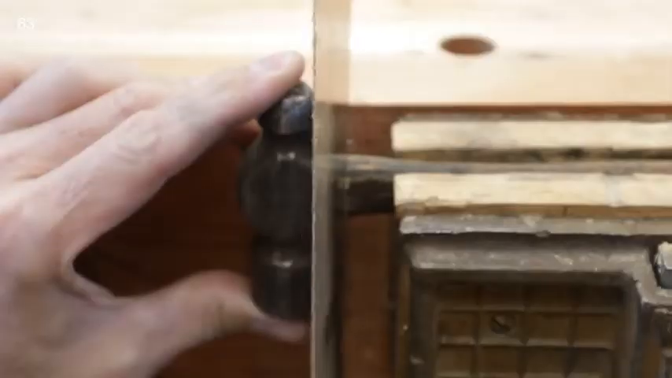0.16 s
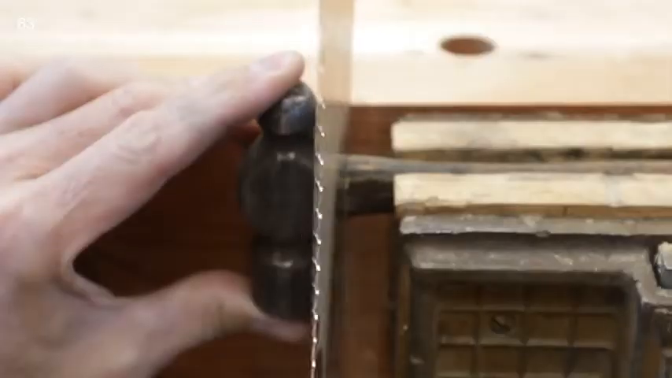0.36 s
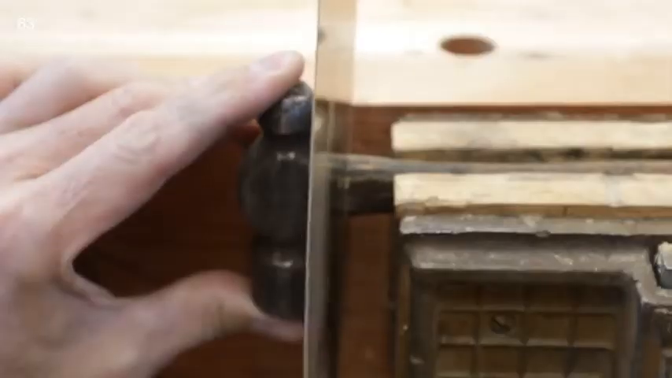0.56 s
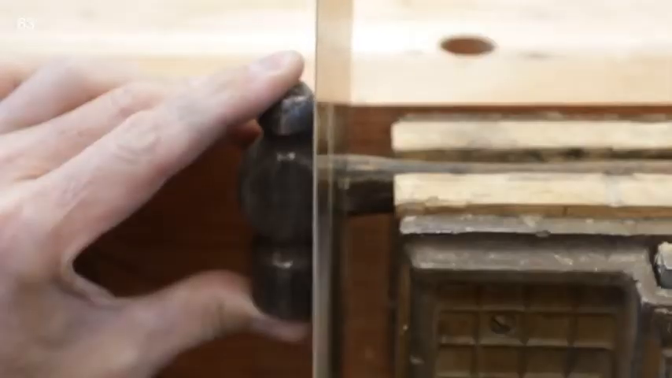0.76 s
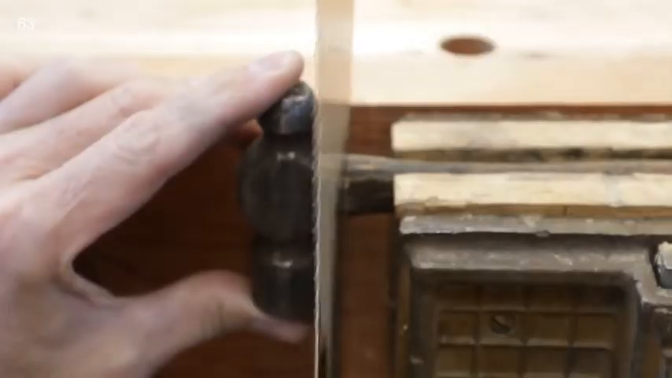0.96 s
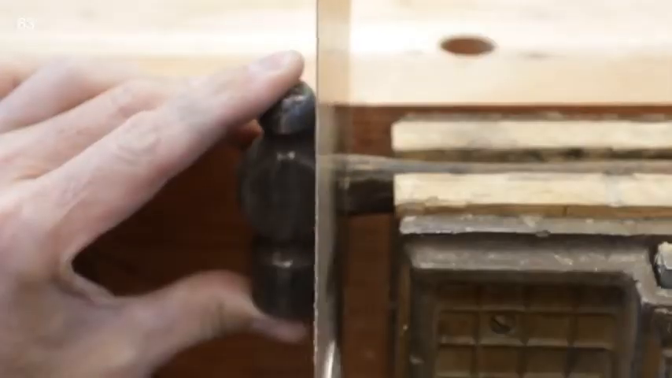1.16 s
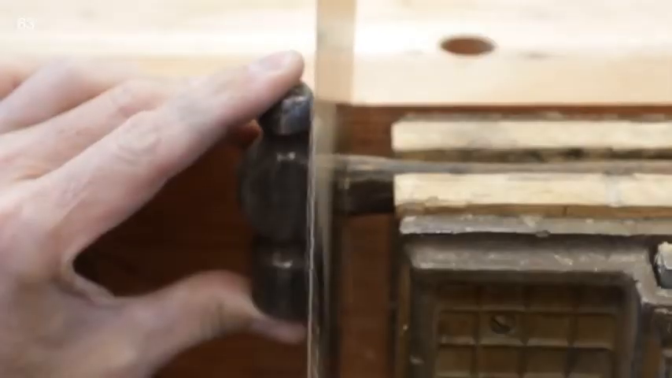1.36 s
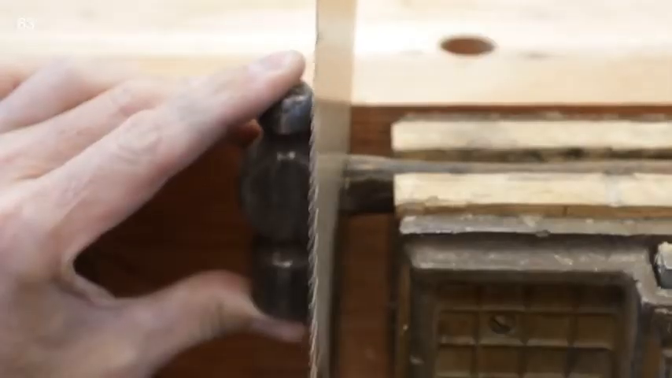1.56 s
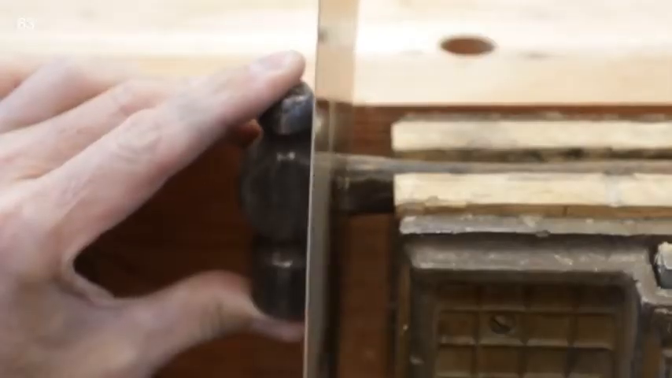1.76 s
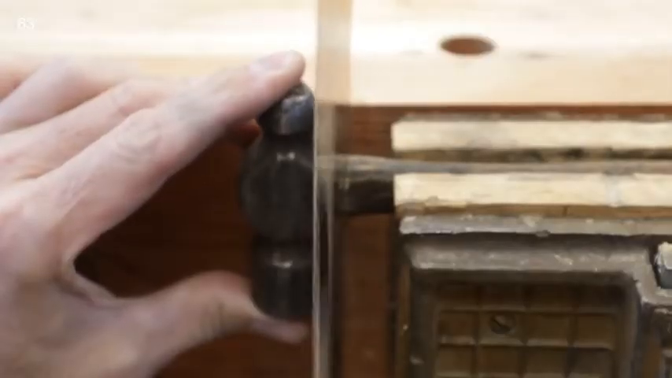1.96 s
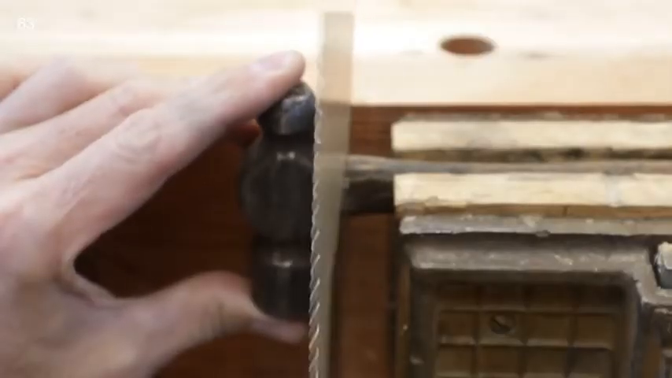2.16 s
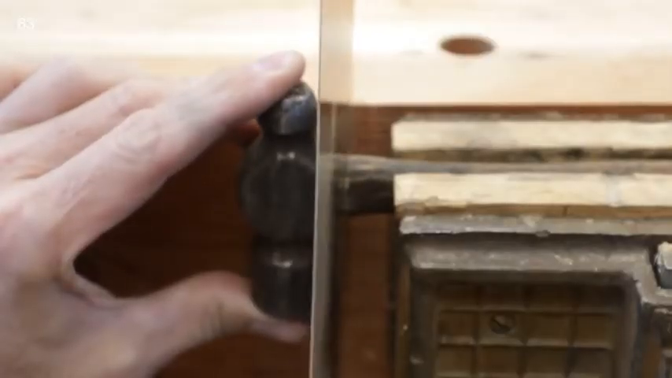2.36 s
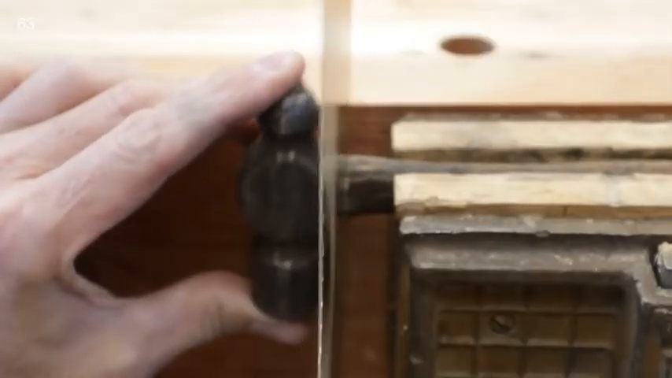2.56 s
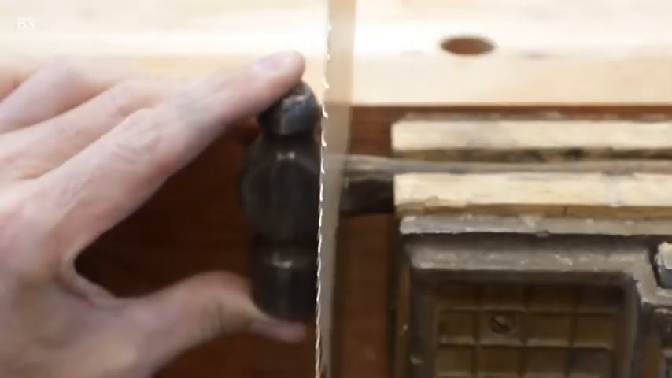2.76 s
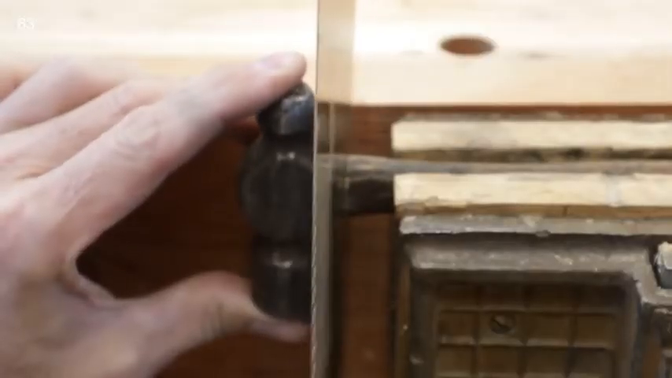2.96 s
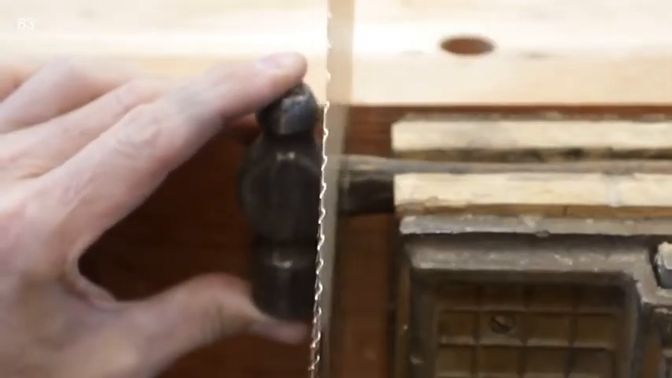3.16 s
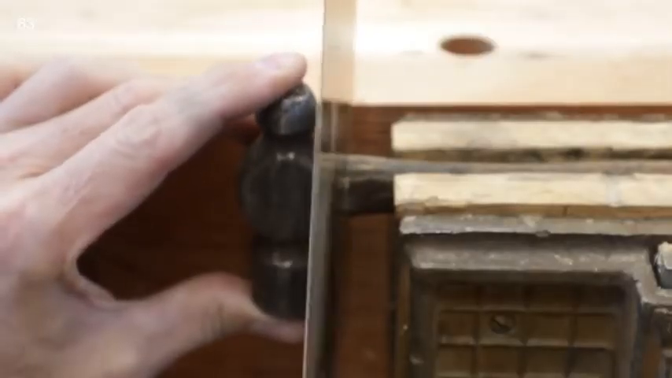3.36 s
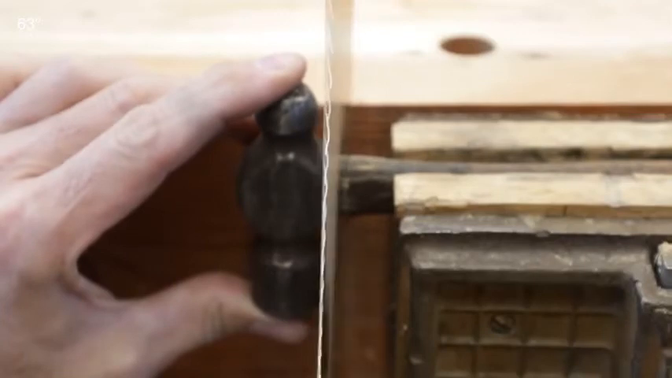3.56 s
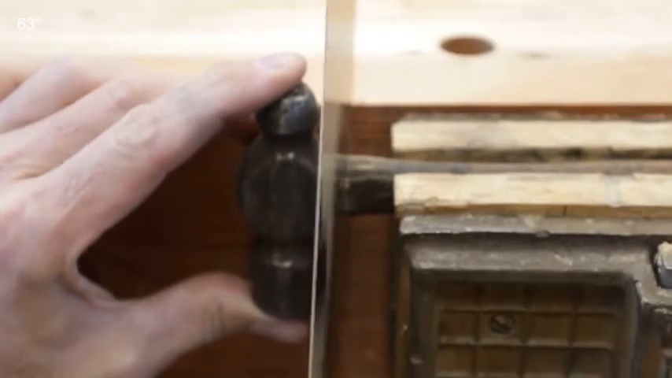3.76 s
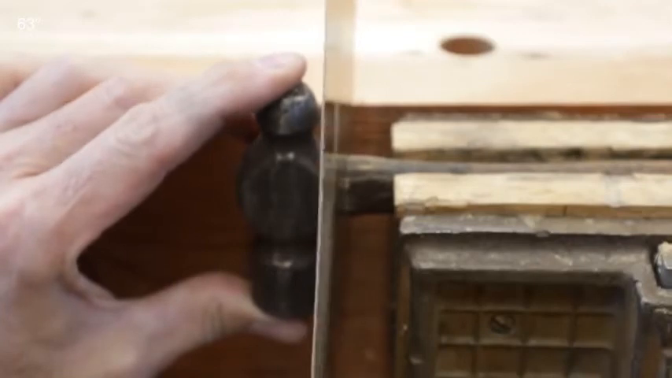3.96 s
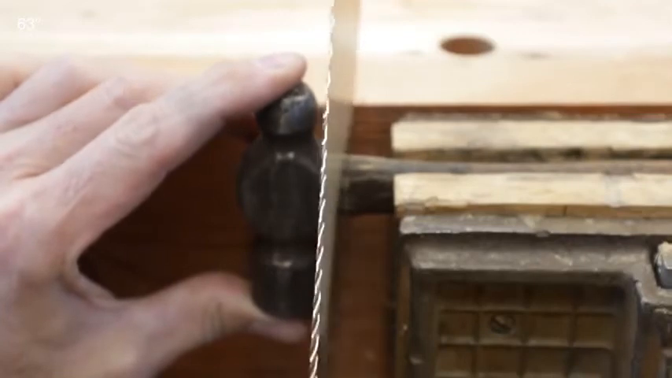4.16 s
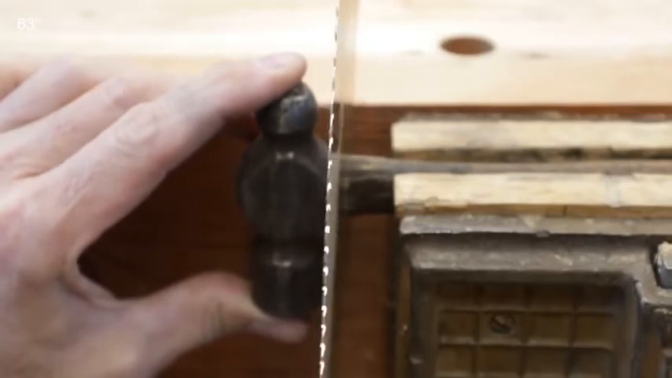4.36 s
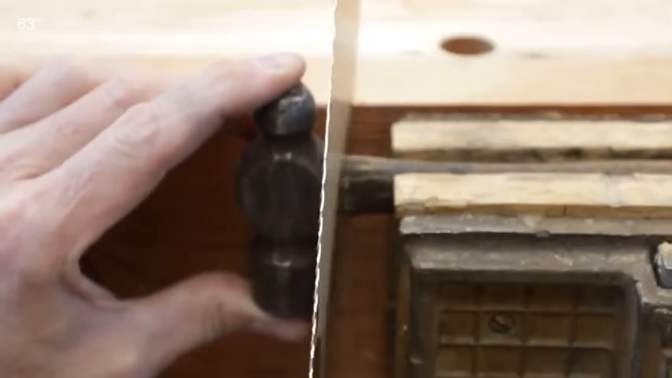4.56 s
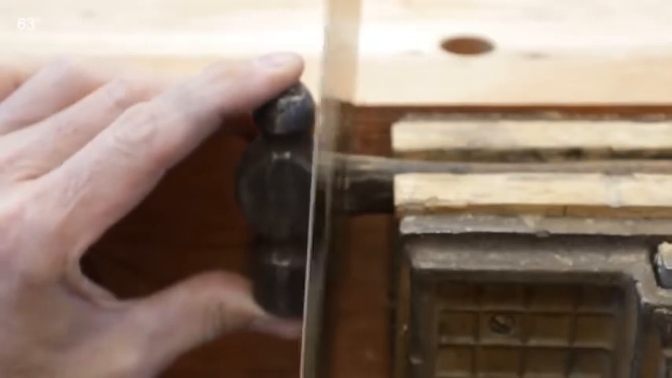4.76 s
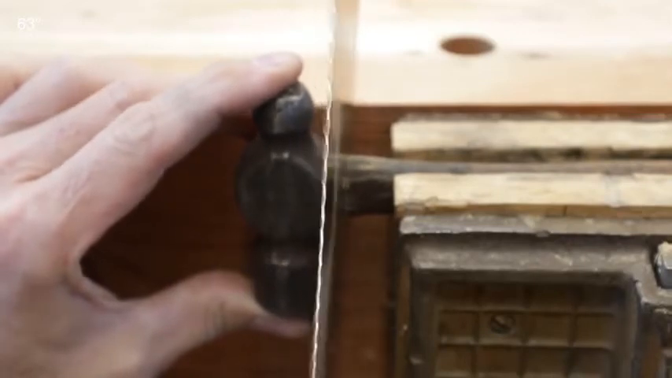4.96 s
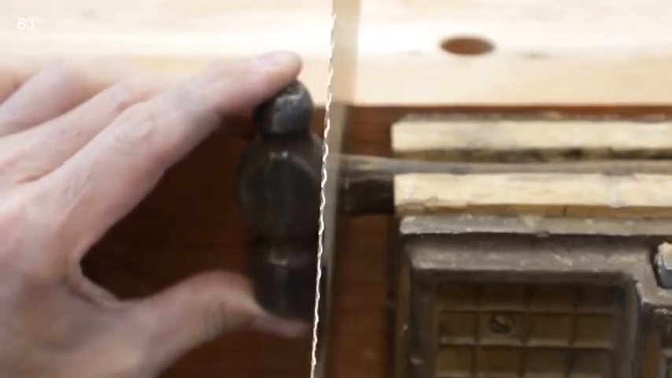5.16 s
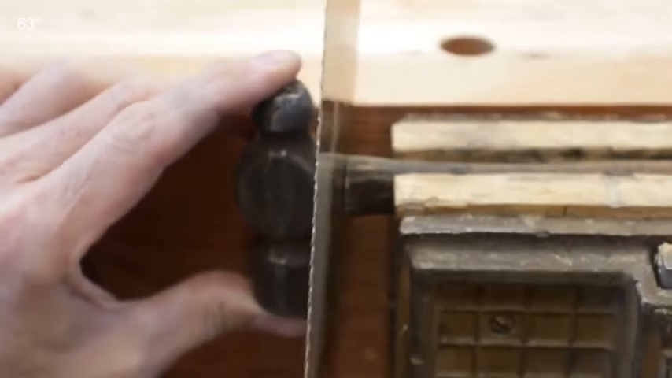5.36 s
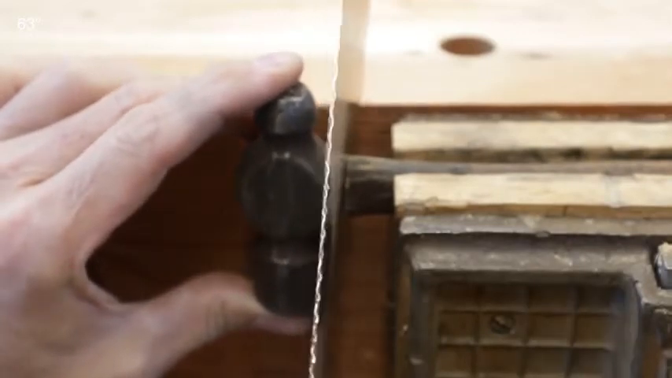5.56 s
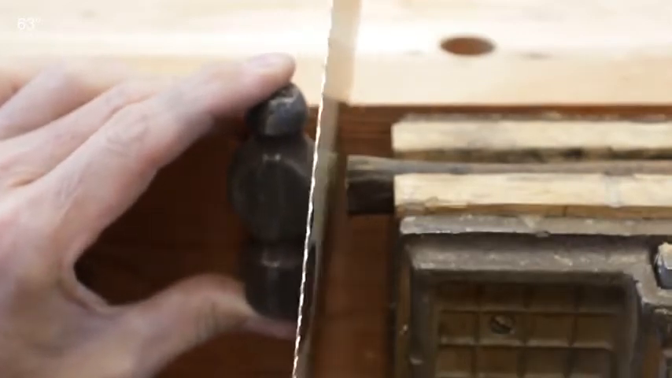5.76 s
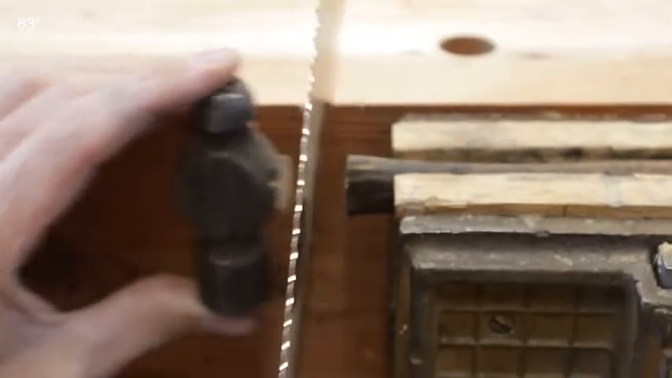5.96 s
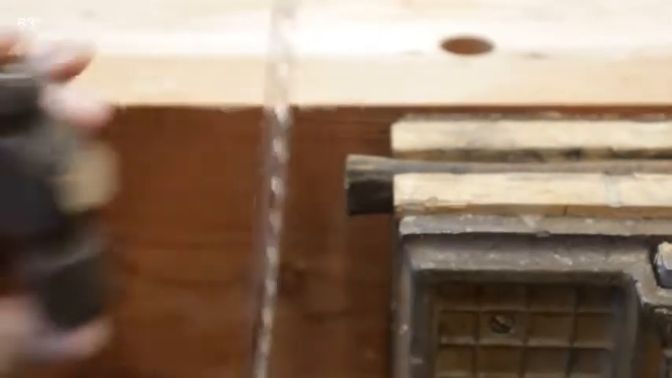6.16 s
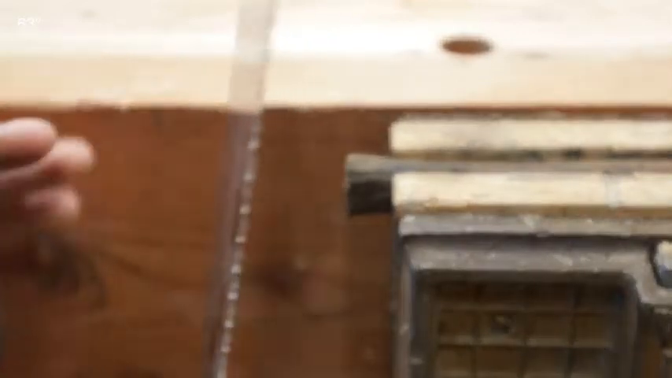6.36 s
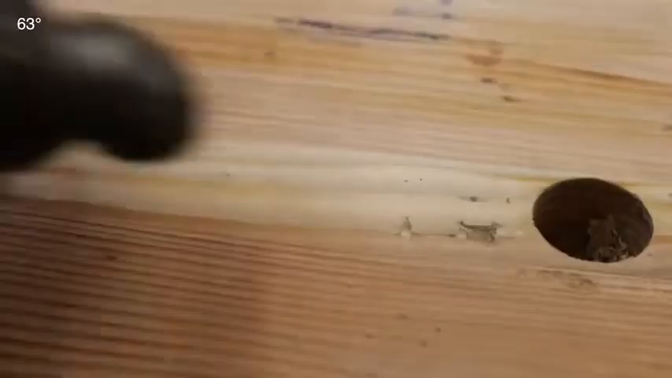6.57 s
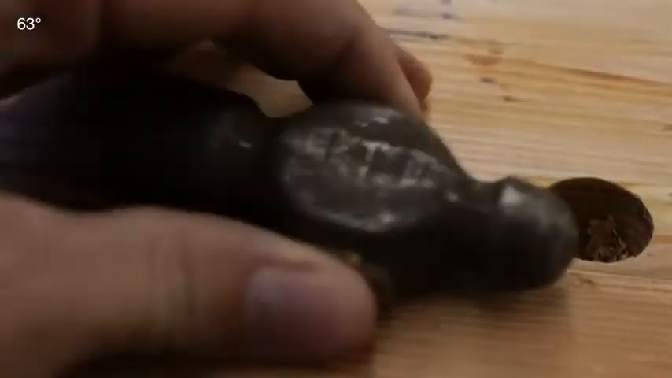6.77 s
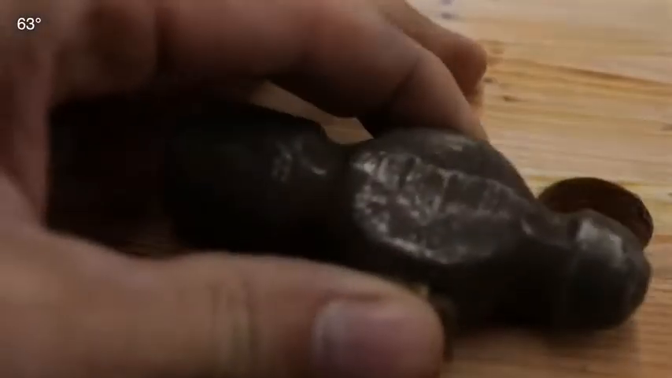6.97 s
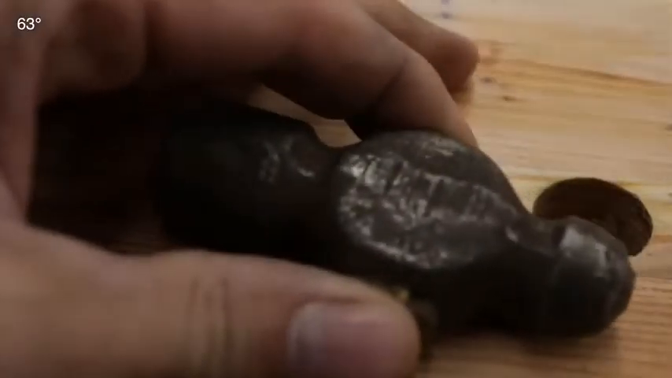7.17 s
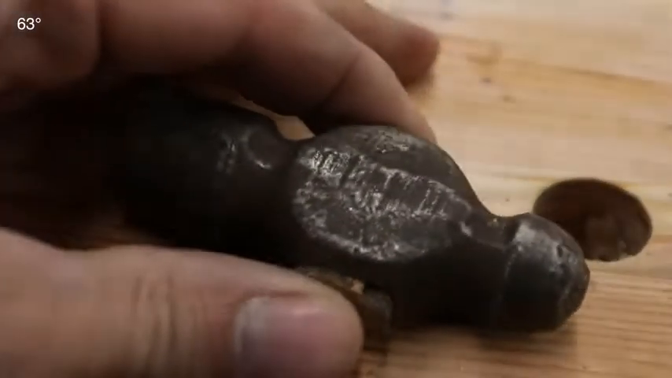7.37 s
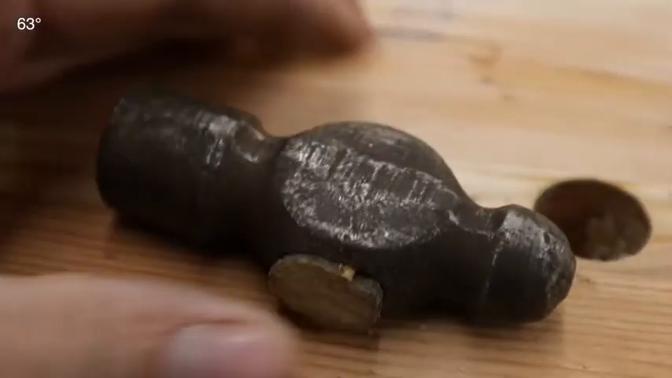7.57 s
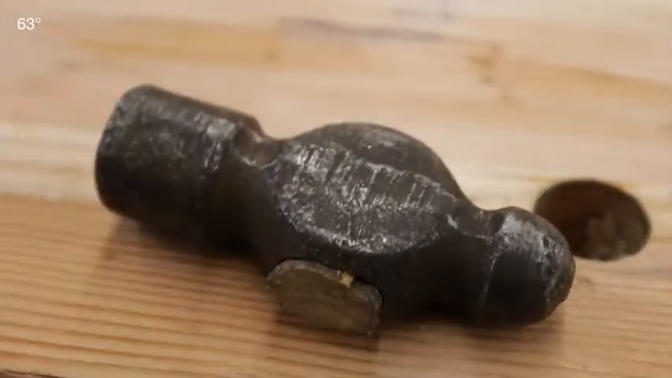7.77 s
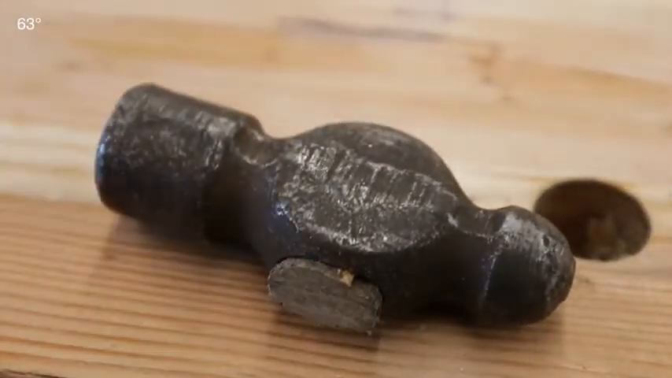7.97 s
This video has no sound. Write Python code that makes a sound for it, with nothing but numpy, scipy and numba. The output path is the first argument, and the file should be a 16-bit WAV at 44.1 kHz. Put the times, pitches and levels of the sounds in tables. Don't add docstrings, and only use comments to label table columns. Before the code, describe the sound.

Close up in a quiet, slightly echoing workshop, a handsaw cuts a clamped wooden handle in quick, regular push and pull strokes. The rasp is bright and gritty, with woody knocks and squawks as teeth catch, and low bench thumps. The cut ends with a faint blade ring and soft dragging. After a short quiet, a steel head lands on the bench with a clustered clack and thud, then small nudges and a cloth brush.

```python
import sys
import numpy as np
from scipy import signal
from scipy.fft import rfft, irfft
from scipy.io import wavfile
from scipy.ndimage import uniform_filter1d, map_coordinates
from numba import njit

SR = 44100
rng = np.random.default_rng(int(sys.argv[2]) if len(sys.argv) > 2 else 0)


def wav_out(sig):
    wavfile.write(sys.argv[1], SR, np.round(np.clip(np.atleast_2d(sig).T, -1, 1) * 32767).astype(np.int16))


def attenuation_scalar(level_db):
    decades = np.asarray(level_db, float) / 20
    return 10 ** decades


N = 353241

# (start [s], tearing hiss [dB], share of the stroke
# at top speed [0-1], handle over hiss [dB], bench top over hiss [dB])
STROKES = [(-0.12, -36, 0.49, 7.5, 5), (0.073, -36, 0.36, 9, -9), (0.296, -32, 0.54, 6.5, -6.5),
           (0.54, -35, 0.41, 9, -4.5), (0.787, -31, 0.47, 8, -5), (1.052, -33.5, 0.48, 6.5, -2.5),
           (1.325, -33, 0.45, 7, 1), (1.709, -34, 0.31, 6.5, -7), (1.955, -30.5, 0.53, 6.5, -2),
           (2.278, -34.5, 0.51, 7, -2.5), (2.577, -30.5, 0.47, 1.5, -1), (2.869, -36.5, 0.43, 5, -13.5),
           (3.124, -33, .52, 3, -3.5), (3.355, -35.5, 0.46, 4.5, -2.5), (3.575, -30, 0.53, 4.5, -6),
           (3.799, -35.5, 0.44, 5, -5), (4.036, -32.5, 0.48, 6.5, -0.5), (4.276, -36.5, 0.48, 8, -4.5),
           (4.513, -33.5, 0.54, 6.5, 1), (4.756, -36.5, 0.45, 5, -6.5), (4.991, -37, 0.43, 6.5, -0.5),
           (5.287, -38, 0.48, 2.5, 0), (5.507, -35.5, 0.54, 6.5, -3.5), (5.724, -38, 0.1, 4.5, -2)]
# (time [s], peak [dB], pitch [Hz], snap [dB])
CATCHES = [(0.393, -18.5, 1740, -6.5), (0.565, -29.5, 1070, -12.5), (0.811, -34, 1250, -9),
           (1.38, -25.5, 823, -2), (1.425, -14, 1990, -10), (1.479, -12.5, 1260, -23),
           (1.524, -16, 1350, -10), (2.067, -22, 1370, -17.5), (3.166, -26, 1150, -10),
           (3.223, -18, 1080, -27.5), (3.252, -18, 1120, -2.5), (3.64, -17, 1095, -15),
           (3.692, -21.5, 1216, -11.5), (4.096, -16.5, 1260, -8), (4.123, -11.5, 1280, -13),
           (4.186, -18, 1276, -27), (4.346, -23.5, 1010, -18), (4.576, -23, 956, -14),
           (4.592, -17.5, 1280, -20), (4.621, -17, 1307, -6), (4.65, -14, 870, -18),
           (5.059, -17, 1300, -10.5), (5.133, -18.5, 1035, -13), (5.344, -22, 976, -15.5),
           (5.412, -17.5, 960.3, -41), (5.583, -14.5, 870, -12.5), (5.609, -17.5, 808, -45),
           (5.635, -16, 824, -6), (5.659, -17.5, 828, -6), (5.73, -19, 874, -10)]
# (time [s], peak [dB], pitch [Hz])
SLIPS = [(0.421, -24.5, 1470), (0.448, -21, 1290), (1.139, -18, 1110), (1.403, -19.5, 600),
         (2.051, -24, 816), (2.467, -29, 1010), (2.501, -20, 1090), (2.609, -32, 915), (2.974, -21, 1280),
         (3.181, -18.5, 1080), (3.285, -23.5, 794), (3.409, -25, 1110), (3.606, -24, 1080),
         (3.668, -27.5, 1280), (3.841, -28, 996), (3.931, -28.5, 991), (3.959, -19.5, 1100),
         (4.057, -28, 950), (4.08, -23.5, 1010), (4.14, -17.5, 1290), (4.16, -20, 1010),
         (4.203, -17.5, 1360), (4.207, -19.5, 985), (4.321, -25.5, 1060), (4.386, -19.5, 1060),
         (4.409, -16, 1080), (4.637, -9, 1280), (4.667, -18, 756), (4.808, -31, 966), (4.822, -28, 1060),
         (4.843, -9.5, 1280), (4.87, -30, 1080), (4.929, -25, 1070), (5.033, -26.5, 1100),
         (5.078, -21.5, 953), (5.119, -19.5, 1080), (5.164, -24.5, 896), (5.182, -20.5, 1170),
         (5.204, -16, 1010), (5.231, -37, 1020), (5.357, -30.5, 947), (5.378, -34, 891),
         (5.397, -22.5, 899), (5.441, -25, 969), (5.462, -20, 910), (5.536, -27, 918), (5.55, -30, 834),
         (5.573, -19, 875), (5.596, -25.5, 810), (5.679, -24, 821), (5.736, -18, 810), (5.749, -20, 1120),
         (5.768, -30, 775)]
# (frequency [Hz], level [dB per Hz])
TEAR = [(1500, -33), (2300, -5), (2700, -2), (3230, 1.5), (4000, -6.5), (4700, -9.5), (5700, -8.5),
        (6700, -13.5), (9000, -15.5), (11600, -17), (13500, -17), (14500, -28.5)]
# (frequency [Hz], width [Hz], level [dB])
HANDLE = [(827, 17, 10.5), (1045, 14, -23.5), (1166, 223, 5), (1274, 25, 14.5), (1800, 10, -6.5),
          (1725, 5.2, 11), (1990, 15.4, -5.5), (1405, 110, -4)]
# (time [s], resonance [Hz], its share [dB], share of the handle wood
# [dB])
NECK = [(0, 1100, -22.5, -1.5), (1.5, 1010, -17, -2), (2.8, 1100, -10, 0.5), (3.2, 1136, -1.5, -2.5),
        (4, 1088, -1.5, -6), (4.7, 1100, -2.5, -4.5), (5.2, 986, 1.5, -12), (5.45, 940, 6, -33.5),
        (5.62, 863, 0.5, -12.5), (5.95, 817, -4.5, 14)]
# (frequency [Hz], width [Hz], level [dB])
BENCH = [(220, 207, -3), (299.6, 20.2, 5.5), (347, 17.4, -3), (447.4, 20.5, 3), (507, 22, 2.5),
         (594, 28, -9.5), (130, 91, -14), (165.7, 68, -3.5), (40.4, 2.9, -5), (623, 214, -7)]
# (frequency [Hz], width [Hz], level [dB])
JAWS = [(295, 31, 1.5), (343.6, 57, 2.5)]
# (frequency [Hz], level [dB], t60 [s])
BLADE = [(624, -12, 0.8), (1249, -13, 0.77), (1712, -24, 1.0), (2552, -10, 0.3), (2837, -17, 1.0),
         (3095, -20, 0.44), (3348, -14, 1.5), (3580, -10, 0.41), (4021, -18, 1.0), (4511, -20, 1.4),
         (4888, -25, 0.63), (5055, -22, 0.71), (5195, -11, 0.25), (5512, -26, 0.83), (5798, -9, 0.9),
         (6702, -26, 0.55), (7031, -37, 5.0), (7817, -19, 0.5), (8538, -21, 0.61), (8893, -24, 0.82),
         (9227, -23, 0.77), (10360, -24, 0.41), (10510, -24, 0.39), (12000, -41, 5.0)]
# (time [s], level [dB])
PINGS = [
    (5.741, -75),
    (5.864, -48),
    (5.969, -71),
]
# (time [s], level [dB])
TICKS = [
    (0.811, -28.5),
    (5.867, -56),
    (5.975, -66),
    (6.263, -59),
]
# (time
# [s], frequency [Hz], level [dB], t60 [s], length [s])
SINGS = [(1.02, 9250, -57, .27, .05), (1.53, 3280, -44, .4, .06), (1.604, 3104, -41, 1.1, .115),
         (1.62, 5800, -56, .55, .13), (2.196, 3004, -34, .17, .033), (3.787, 4030, -48.5, .8, .31),
         (4.06, 3030, -38, .15, .033), (4.623, 3200, -35, .35, .067), (5.668, 6370, -44, .3, .08),
         (5.7, 9238, -56, .3, .12), (5.745, 4840, -52, .2, .07), (5.76, 1846, -49, .2, .05),
         (5.975, 790, -61, .4, .12),
         (5.776, 5798, -58, 1.1, .1),
    (5.791, 4021, -60, 1.1, .085),
    (5.863, 3095, -51, 2.2, .112),
    (5.962, 3095, -63, .9, .3),
    (5.865, 4511, -66, 1.3, .39),
    (5.95, 624, -69, 2.2, .6),
]
# (time [s], frequency [Hz], level [dB], t60 [s], length [s])
PLANK_NOTES = [
    (6.869, 1291, -53, .3, .031),
    (6.9, 1271, -33.5, .2, .015),
    (6.917, 1281, -33.5, .2, .019),
    (6.947, 1031, -36.5, .12, .041),
]
# (time [s], low thud [dB], steel on wood [dB])
KNOCKS = [
    (6.868, -38.5, -56),
    (6.9, -45, -28),
    (6.921, -32.5, -41),
    (6.949, -39, -47),
]
# (time [s], low [dB], middle [dB])
NUDGE = [
    (7.12, -70, -60),
    (7.222, -81, -78),
    (7.252, -72, -89),
    (7.33, -61, -71),
    (7.41, -61, -74),
    (7.434, -65, -95.5),
    (7.634, -75, -97.5),
    (7.72, -104, -92),
]
# (frequency [Hz], width [Hz], level [dB])
TOP = [(194, 40, -21), (261, 24, -14), (351, 17, 0.5), (383, 26, -3.5), (441, 42, -7), (505, 54, -10),
       (625, 72, -13)]
# (frequency [Hz], width [Hz], level [dB])
PLANK = [(123, 77, -16), (254, 15, 7.5), (464, 20, 11.5), (705, 22, -9), (1070, 23, 4), (1100, 35, 9),
         (1180, 29, -7), (1470, 51, -3), (1280, 87, 4), (870, 30, 2), (820, 25, -6)]
# (frequency [Hz], width [Hz], level [dB])
SETTLE = [(188.7, 45, -7.5), (266.4, 44, -3.5), (326, 21, 1.5), (390, 36, -2.5)]
# (frequency [Hz], level [dB per Hz])
CLACK = [(200, -37), (550, -6.5), (800, -7), (1030, 3), (1250, -3.5), (1450, -9.5), (1900, -14.5),
         (2250, -22.5), (2700, -40.5), (3400, -33), (4500, -37.5), (7000, -58)]
# (time [s], level [dB])
CARRY = [
    (5.9, -69),
    (5.968, -59.5),
    (6.052, -71),
    (6.418, -62.5),
    (6.536, -62.5),
    (6.575, -62.5),
]
# (frequency [Hz], level [dB per Hz])
DRAG = [(80, -9), (260, -1.5), (600, -5.5), (1200, -9.5), (2300, -13.5), (3200, -10.5), (3800, -17),
        (4400, -19.5), (5200, -25), (6000, -22.5), (7500, -28), (14000, -27.5)]
# (frequency [Hz], width [Hz], level [dB])
SLIDE = [(1910, 120, 0), (3150, 94, 4), (4440, 190, -3), (6000, 330, 0), (2450, 170, -4)]
# (time [s], level [dB])
SLEEVE = [
    (7.55, -97.5),
    (7.606, -92),
    (7.696, -73),
    (7.828, -70.5),
    (7.916, -83),
    (7.95, -75),
]
# (time [s], level [dB], sway [Hz], held [s])
ROCK = [(0.021, -36, 57.3, 0.016), (0.462, -37.5, 72.6, 0.075), (0.88, -39, 74.7, 0.035),
        (1.09, -52, 74, .01), (1.45, -40, 74.9, 0.09), (1.66, -38, 74.2, 0.01687), (2.11, -31, 65, 0.013),
        (2.28, -48, 77.7, .01), (2.662, -30.5, 72.4, 0.15), (2.95, -43, 74.3, 0.0095),
        (3.27, -34.5, 68.5, 0.049), (3.7, -36, 67.7, 0.014), (3.84, -51, 66.6, 0.017),
        (4.1, -55, 63.3, .01), (4.22, -42, 69.3, 0.0085), (4.69, -38.5, 68.1, 0.018), (5.0, -57, 61.5, .01),
        (5.13, -47, 42, 0.11), (5.67, -47.5, 39.4, 0.1), (5.85, -58, 36, 0.076)]
# (frequency [Hz], t60 [s])
ROOM_T60 = [(100, 0.98), (400, 0.82), (1200, 0.41), (4000, 0.35), (12000, 0.13)]
# (frequency [Hz], level [dB per Hz])
AIR = [(25, 1.5), (100, -3.5), (320, -5), (700, -9), (1500, -14.5), (3000, -17.5), (8000, -21),
       (14500, -22)]
# (frequency [Hz], level [dB])
WHINES = [
    (340, -86),
    (12000, -87),
]

THROUGH_S, DAMPED_S, STILL_S = 5.832, 5.972, 6.262
SPEED_POWER, TURN_DB = 1.56, -16
HANDLE_LAG_DB, BENCH_LAG_DB = -0.5, 3
PUSH_VICE_DB = 5.5
STICK_DB, STICK_S = 1, 0.0068
SLIP_DB, SLIP_S = 3, 0.0066
NECK_WIDTH_HZ, NECK_NARROWS = 413, 1.3
JAWS_FADE_DB_PER_S = 6
ROCK_RISE_DB_PER_S, ROCK_FALL_DB_PER_S = 258.5, 130.5
AIR_DB = -72


def saw():
    stroke, handle_db, bench_db, load_db = arm()
    neck_hz, neck_db, vice_db = in_time(NECK)
    jolts, surge_db = slips()
    chatter_db = 1.8 * drift(90.) + surge_db
    teeth, fibres = grains(900., 1.35), grains(12000., 0.81)

    tearing = stroke * attenuation_scalar(chatter_db - 4.5) * (0.15 * teeth + 0.8 * fibres)
    hiss = colour(tearing + attenuation_scalar(1) * snaps(), TEAR)
    blade = attenuation_scalar(-20) * pinched_blade(stroke, 21.0, patchy_db=7.5)

    push = stroke * attenuation_scalar(handle_db + chatter_db) * (0.43 * teeth + 0.31 * fibres) + attenuation_scalar(17) * jolts
    neck_push = push + 0.5 * stroke * attenuation_scalar(handle_db) * grains(450.0, 1.2)
    neck = attenuation_scalar(neck_db - 4.0) * neck_ring(neck_push, neck_hz)
    broad = colour(push, [(300, -30.5), (650, -6), (950, 3), (2000, 0.5), (3500, -25.0)])
    wood = attenuation_scalar(-6) * body(push, HANDLE) + attenuation_scalar(-4.5) * broad

    bench_push = stroke * attenuation_scalar(bench_db) * (0.6 * teeth + 0.36 * grains(2000., 5.1))
    bench = attenuation_scalar(-2.0) * body(bench_push, BENCH)
    jaws_db = -JAWS_FADE_DB_PER_S * np.arange(N) / SR - 1.8 * load_db
    jaws = attenuation_scalar(-7.0) * body(stroke * attenuation_scalar(jaws_db) * fibres, JAWS)
    return hiss + blade + neck + attenuation_scalar(vice_db + load_db) * wood + bench + jaws


def arm():
    start, *columns = np.transpose(STROKES)
    t, ends = np.arange(N) / SR, np.append(start[1:], THROUGH_S)
    k = np.searchsorted(start, t, "right") - 1
    tear_db, top, handle_db, bench_db = (c[k] for c in columns)
    done = np.clip((t - start[k]) / (ends[k] - start[k]), 0, 1)
    skew = np.log(.5) / np.log(np.clip(top, .1, .9))
    speed = np.abs(np.sin(np.pi * done ** skew))
    turn = attenuation_scalar(TURN_DB - 183 * np.maximum(t - THROUGH_S, 0))
    stroke = attenuation_scalar(tear_db) * (speed ** SPEED_POWER + turn)
    handle_db = handle_db + HANDLE_LAG_DB * (1 - speed)
    bench_db = bench_db + BENCH_LAG_DB * (1 - speed)
    return stroke, handle_db, bench_db, PUSH_VICE_DB * np.cos(np.pi * k) / 2


def slips():
    s, db, hz = np.transpose(SLIPS)
    scatter_db = 1.5 * rng.standard_normal(len(s))
    marks = spikes(np.append(s, np.transpose(CATCHES)[0]), 0)
    after = fading(marks, SLIP_S)
    before = fading(marks[::-1], STICK_S)[::-1]
    bite_db = SLIP_DB * after - STICK_DB * (before - marks)
    return spikes(s, db - 8.0 + scatter_db), bite_db - uniform_filter1d(bite_db, size=1100)


def snaps():
    s, db, hz, snap_db = np.transpose(CATCHES)
    return dying(s, db + snap_db - 9.0, 0.008)


def pinched_blade(stroke, width_hz, patchy_db):
    out, r, clicks = 0, np.exp(-np.pi * width_hz / SR), grains(3000., 2.5)
    modes = [(hz * split, db) for hz, db, t60 in BLADE[2:-1] for split in (1, 1.07)]
    for k, (hz, db) in enumerate(modes):
        if k % 6 == 0:
            grip = np.minimum(drift(22.), 1.6)
        grip = np.roll(grip, 5003)
        level_db = 0.43 * db - 2.05 * np.log2(hz / 3000) + patchy_db * grip
        own = np.roll(clicks, 977 * k) * stroke * attenuation_scalar(level_db)
        w = 2 * np.pi * hz / SR
        gain = np.sqrt(1 - r * r) * np.sin(w)
        out = out + signal.lfilter([gain], [1, -2 * r * np.cos(w), r * r], own)
    return out


def neck_ring(push, hz):
    soft = hz / 1070.0
    hz = hz * (1 + 0.1 * soft ** 2 * drift(25.))
    r = np.exp(-np.pi * NECK_WIDTH_HZ * soft ** NECK_NARROWS / SR)
    return gliding(gliding(push, hz, r, SR), hz, r, SR) * np.sqrt(1 - r * r)


@njit
def gliding(x, hz, r, rate):
    y = np.zeros(len(x))
    for i in range(2, len(x)):
        turn = 2 * r[i] * np.cos(2 * np.pi * hz[i] / rate)
        y[i] = x[i] - x[i - 2] + turn * y[i - 1] - r[i] * r[i] * y[i - 2]
    return y * np.sqrt((1 - r * r) / 2)


def catches():
    out, t = np.zeros(N), np.arange(SR // 20) / SR
    events = [row[:3] for row in CATCHES] + [(s, db - 3.5, hz) for s, db, hz in SLIPS]
    for s, db, hz in events:
        stiff = np.clip((hz - 850.) / 440.0, 0, 1)
        delay = 0.00082 * stiff * (1 - np.exp(-t / 0.00086))
        swell = 0.91 * (1 - np.exp(-t / 0.00081))
        decay = np.exp(-t / (.006 - 0.0021 * stiff))
        ring = np.sin(2 * np.pi * hz * (t - delay)) * swell * decay
        out[int(s * SR):int(s * SR) + len(t)] += attenuation_scalar(db + 0.5) * ring
    return out


def free_blade():
    rings = []
    luck_db = rng.normal(0, 1, (len(PINGS), len(BLADE)))
    for (s, db), row in zip(PINGS, luck_db):
        for (hz, mode_db, t60), extra_db in zip(BLADE[:-1], row):
            broad = t60 < .45 and hz > 1800
            length = max((DAMPED_S if broad else STILL_S) - s, .012)
            rings.append((s, hz, db + mode_db + extra_db, min(t60, 2), length))
    out = np.zeros(N)
    for s, hz, db, t60, length in rings + SINGS + PLANK_NOTES:
        t, first = np.arange(int(length * SR)) / SR, int(s * SR)
        edges = np.minimum(1, np.minimum(t / 0.0014, (length - t) / 0.012))
        tone = np.sin(2 * np.pi * hz * (t + first / SR))
        out[first:first + len(t)] += edges * attenuation_scalar(db - 60 * t / t60) * tone
    ticks = dying(*np.transpose(TICKS), 0.0069)
    return out + colour(ticks, [(1000, -11.0), (3500, 9.0), (7000, -8), (11000, 3.5), (14000, 0.5)])


def knocks():
    s, thud_db, clack_db = np.transpose(KNOCKS)
    rattle = grains(1500., 1.8)[:SR // 5] * np.exp(-np.arange(SR // 5) / SR / 0.016)
    rattle[0] = 9

    def rattling(db):
        return signal.fftconvolve(spikes(s, db), rattle)[:N]

    low, middle = burst(NUDGE) * grains(1100.0, 2.3)
    thud = body(rattling(thud_db - 10.5), TOP) + body(dying(s, thud_db - 12.0, 0.041), TOP)
    settling = 0.47 * body(low, SETTLE)
    planks = attenuation_scalar(-10) * body(rattling(clack_db), PLANK)
    steel_edge = colour(dying(s, clack_db - 28.5, 0.011),
                        [(2400, -25), (3300, 5), (3800, -2), (4200, -14), (8000, -25)])
    clack = rattling(clack_db - 12.5) + 0.46 * middle + dying(s, clack_db - 12.0, 0.049)
    return thud + settling + planks + steel_edge + colour(clack, CLACK)


def sleeve():
    cloth = colour(burst(SLEEVE)[0] * grains(8000., 2.0),
                   [(500, -9.0), (3500, -0.5), (9000, -3), (14000, -4.5)])
    rub = burst(CARRY)[0] * attenuation_scalar(1.5 * drift(45.)) * grains(6600.0, 2.0)
    sliding = np.clip((np.arange(N) / SR - STILL_S) / .1, 0, 1)
    return attenuation_scalar(0.5) * cloth + attenuation_scalar(0.5) * colour(rub, DRAG) + attenuation_scalar(-9.0) * body(sliding * rub, SLIDE)


def rocking():
    sway = np.sqrt(2) * np.sin(2 * np.pi * np.cumsum(in_time(ROCK)[1]) / SR)
    rumble = body(rng.standard_normal(N), [(60.6, 11, 9.0), (130.0, 160, 4.0)])
    return shoves() * (0.94 * sway + 0.3 * rumble)


def shoves():
    t, levels = np.arange(N) / SR, []
    for s, db, hz, held in ROCK:
        rise = ROCK_RISE_DB_PER_S * np.maximum(s - t, 0)
        fall = ROCK_FALL_DB_PER_S * np.maximum(t - s - held, 0)
        levels.append(db - rise - fall)
    return attenuation_scalar(np.max(levels, axis=0))


def workshop(x):
    t, tail = np.arange(SR) / SR, 0
    white = rng.standard_normal(SR)
    for low in 60 * 2. ** np.arange(8):
        octave = signal.butter(2, [low, 2 * low], "band", fs=SR, output="sos")
        tail = tail + signal.sosfilt(octave, white) * attenuation_scalar(-60 * t / at_hz(ROOM_T60, 4.08 * low))
    tail = tail * (t > .005)
    return signal.fftconvolve(x, tail / np.linalg.norm(tail))[:N]


def room_tone():
    t = np.arange(N) / SR
    lines = sum(attenuation_scalar(db + 0.5) * np.sin(2 * np.pi * hz * t) for hz, db in WHINES)
    return attenuation_scalar(AIR_DB) * colour(rng.standard_normal(N), AIR) + lines


def grains(per_s, spread_db):
    sizes = attenuation_scalar(spread_db * np.minimum(rng.exponential(1, N), 4)) * rng.choice([-1, 1], N)
    return rms_one(sizes * (rng.random(N) < per_s / SR))


def spikes(times, db):
    out = np.zeros(N)
    out[(np.asarray(times) * SR).astype(int)] = attenuation_scalar(np.asarray(db))
    return out


def fading(x, decay_s):
    return signal.lfilter([1], [1, -np.exp(-1 / (decay_s * SR))], x)


def dying(times, db, decay_s):
    return fading(spikes(times, db), decay_s) * rng.standard_normal(N)


def body(x, modes):
    pulse, t = 0, np.arange(SR // 5) / SR
    for k, (hz, width_hz, db) in enumerate(modes):
        ring = np.exp(-np.pi * width_hz * t) * np.sin(2 * np.pi * hz * t)
        pulse = pulse + (-1) ** k * attenuation_scalar(db) * width_hz * ring
    return signal.fftconvolve(x, pulse / np.linalg.norm(pulse))[:N]


def colour(x, spectrum):
    size = 4096
    cepstrum = irfft(np.log(attenuation_scalar(at_hz(spectrum, np.linspace(1, SR / 2, size // 2 + 1)))))
    cepstrum[1:size // 2] *= 2
    cepstrum[size // 2 + 1:] = 0
    pulse = irfft(np.exp(rfft(cepstrum)))
    return signal.fftconvolve(x, pulse / np.linalg.norm(pulse))[:N]


def at_hz(points, hz):
    points = np.array(points)
    return np.interp(np.log(hz), np.log(points[:, 0]), points[:, 1])


def in_time(rows):
    s, *columns = np.transpose(rows)
    return [np.interp(np.arange(N) / SR, s, c) for c in columns]


def burst(rows):
    silent = (-120,) * (len(rows[0]) - 1)
    before, after = (rows[0][0] - .01,) + silent, (rows[-1][0] + .01,) + silent
    return attenuation_scalar(in_time([before] + list(rows) + [after]))


def drift(rate):
    knots = rng.standard_normal(int(N / SR * 400) + 3)
    return map_coordinates(knots, [np.arange(N) / SR * rate], order=1) * 1.2


def rms_one(x):
    return x / np.sqrt(np.mean(x ** 2) + 1e-30)


def scene():
    sawing, knock = saw() + catches() + free_blade(), knocks()
    echo = workshop(attenuation_scalar(-11.0) * sawing + attenuation_scalar(-6.5) * knock)
    return (sawing + knock + echo + rocking() + sleeve() + room_tone())[None]


def roll_off(x):
    return signal.sosfilt(signal.butter(12, 14620, fs=SR, output="sos"), x)


def record(dry):
    low_pass = signal.cheby2(12, 50, 15000, fs=SR, output="sos")
    mix = signal.sosfilt(low_pass, dry)
    return roll_off(mix)


dry = scene()
out = record(dry)
wav_out(out)
```